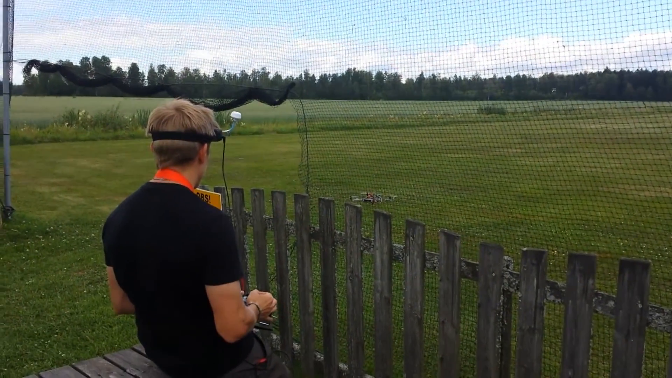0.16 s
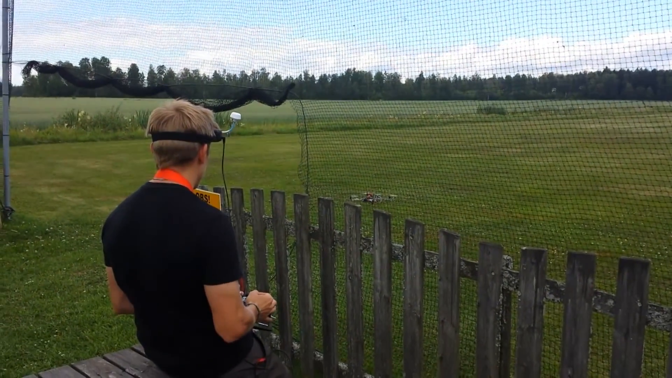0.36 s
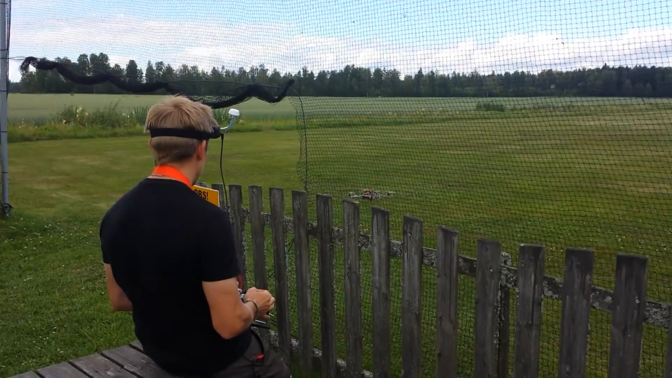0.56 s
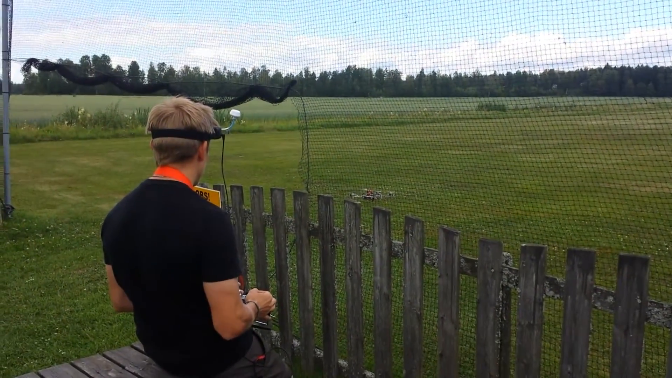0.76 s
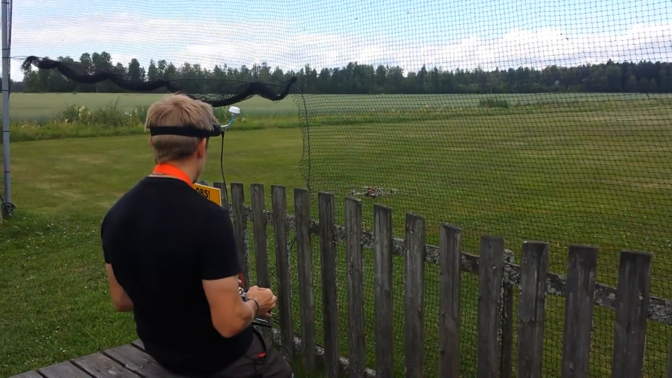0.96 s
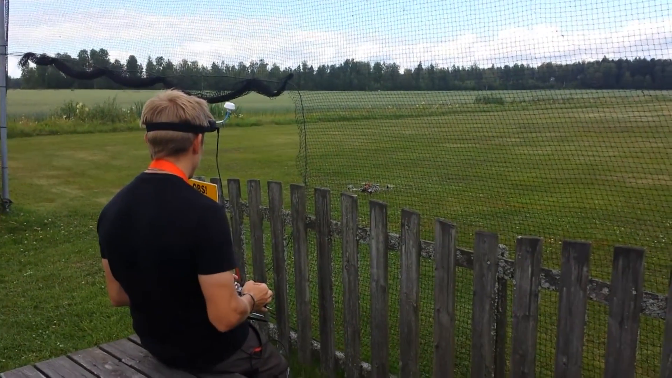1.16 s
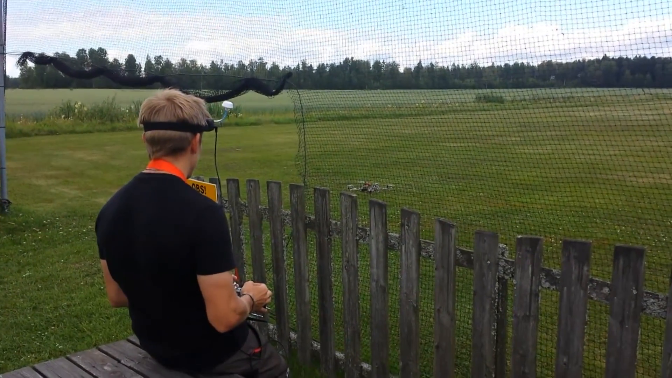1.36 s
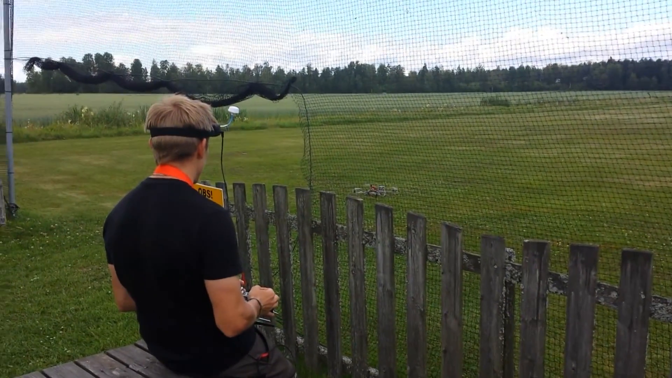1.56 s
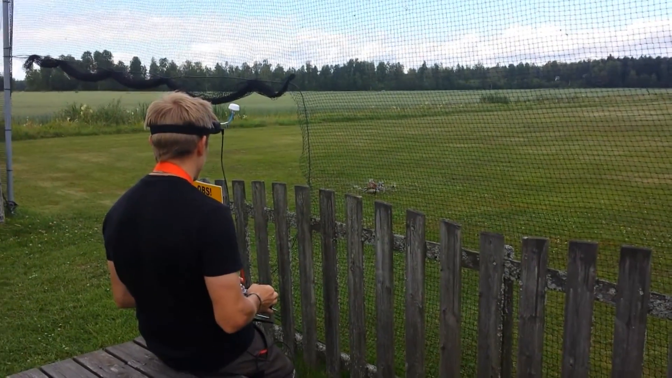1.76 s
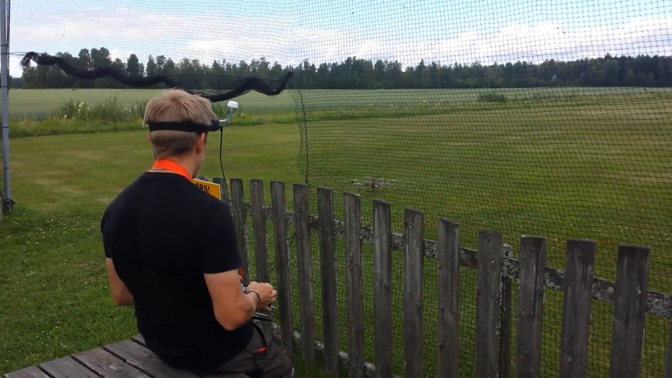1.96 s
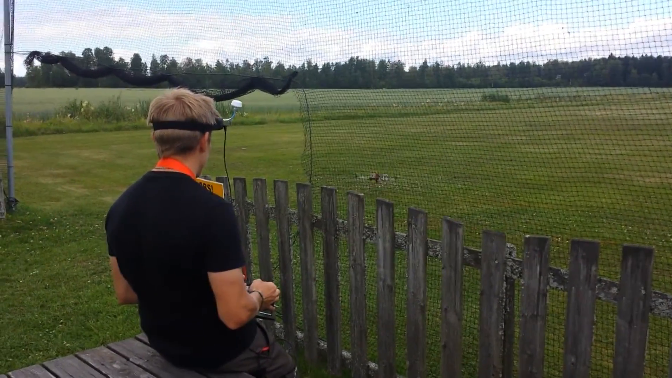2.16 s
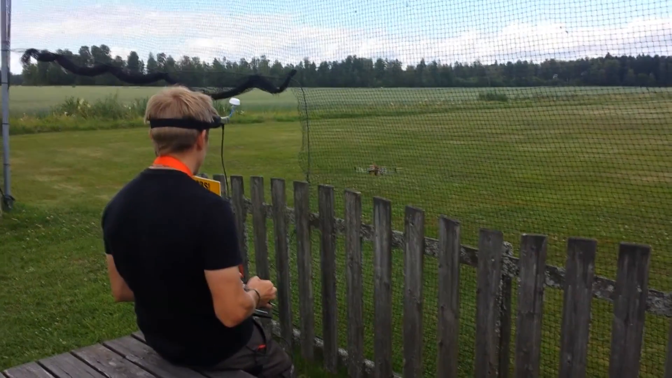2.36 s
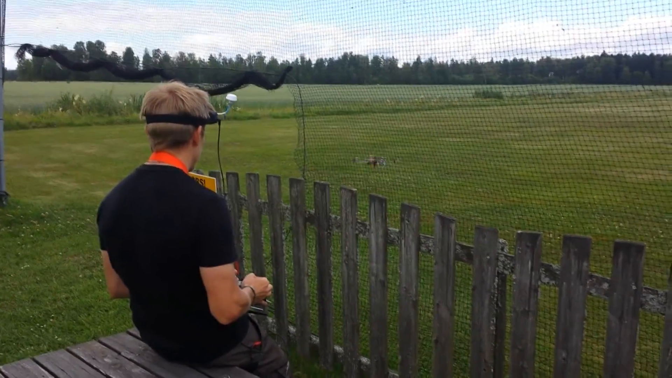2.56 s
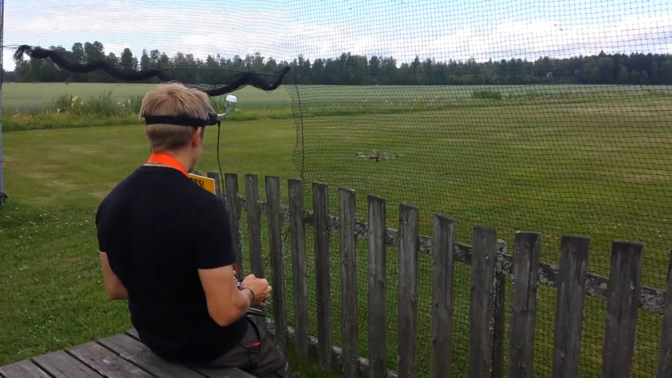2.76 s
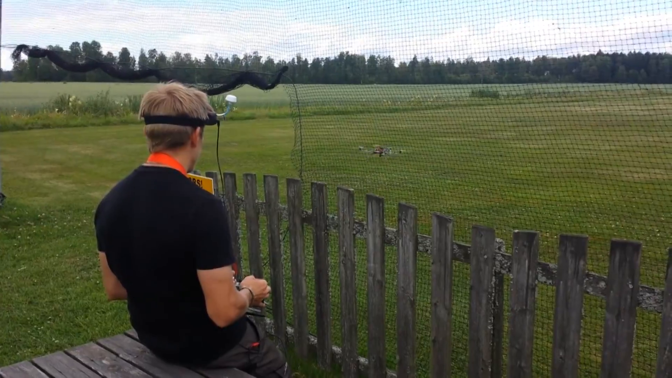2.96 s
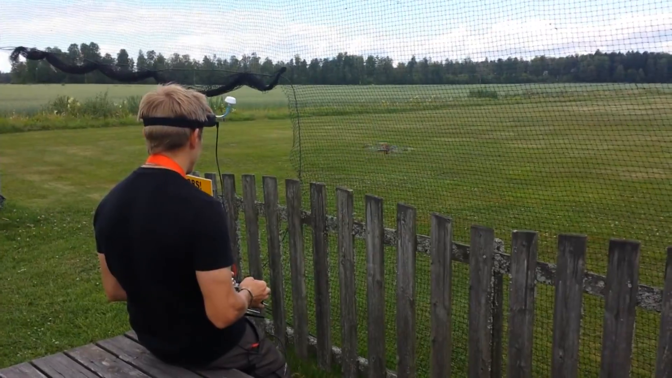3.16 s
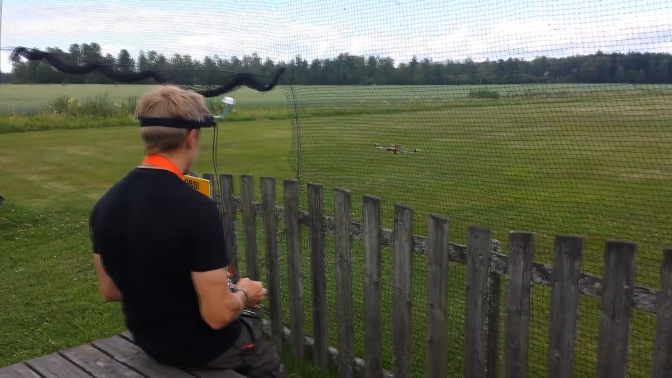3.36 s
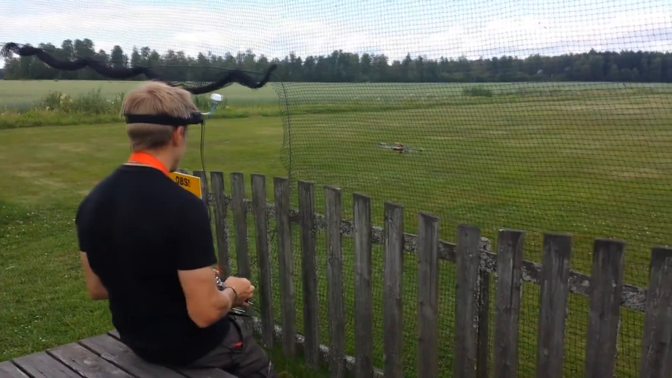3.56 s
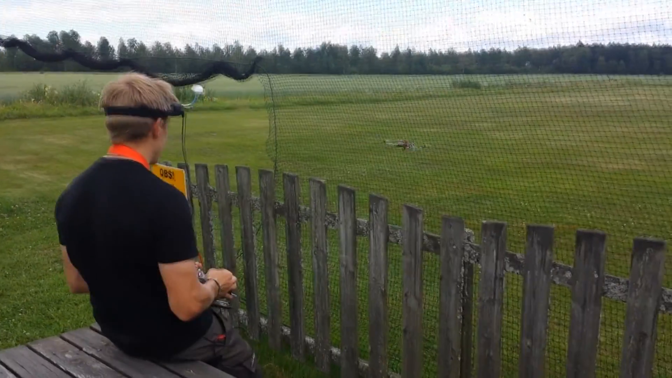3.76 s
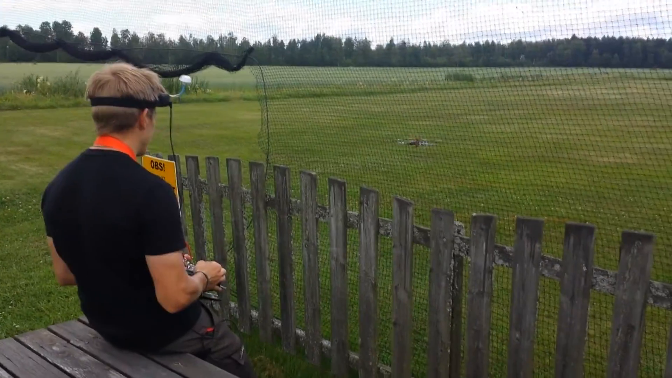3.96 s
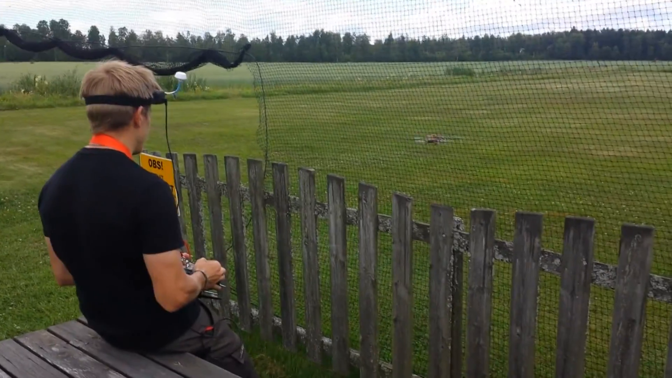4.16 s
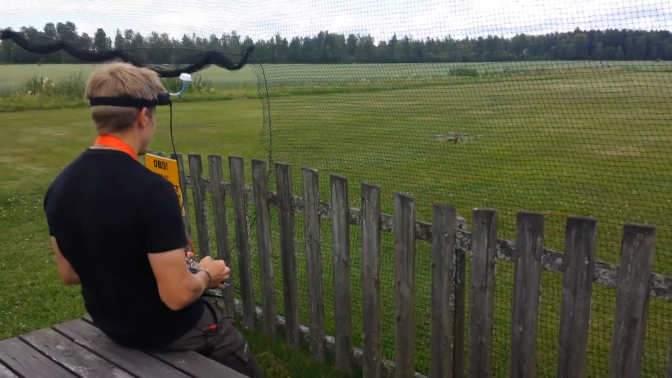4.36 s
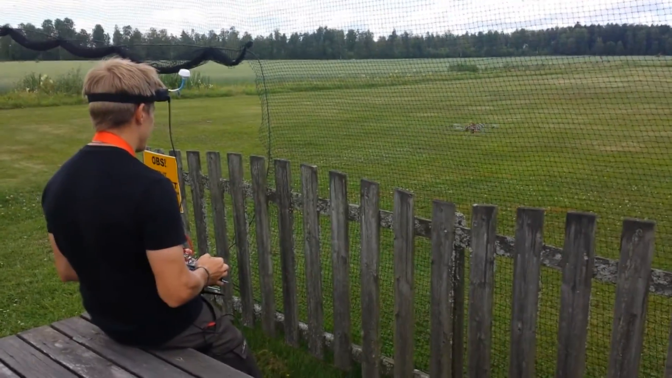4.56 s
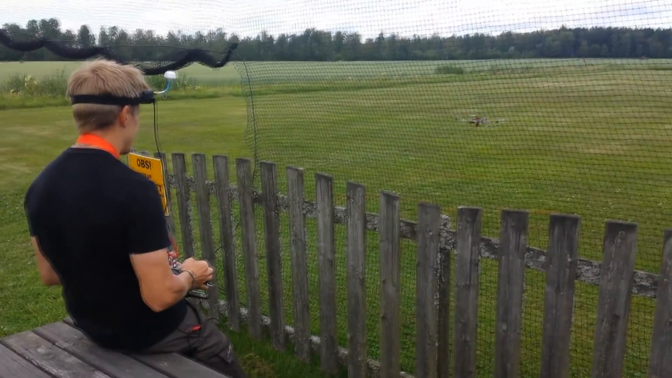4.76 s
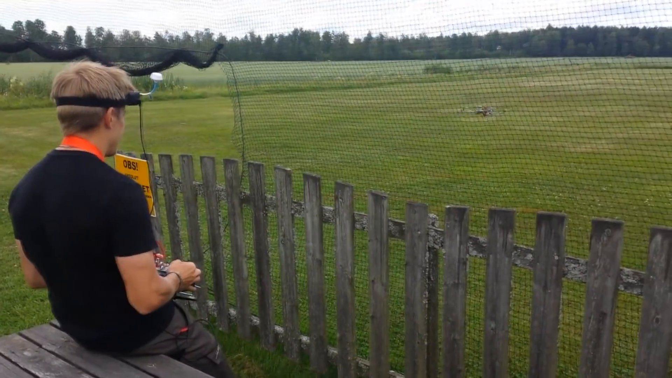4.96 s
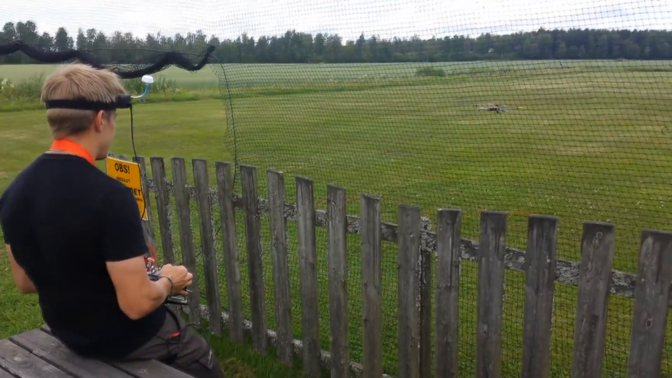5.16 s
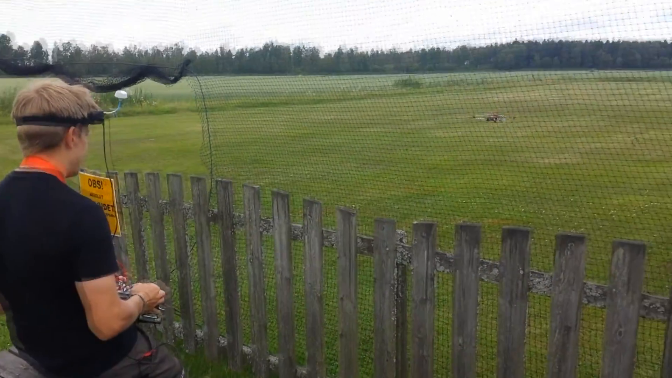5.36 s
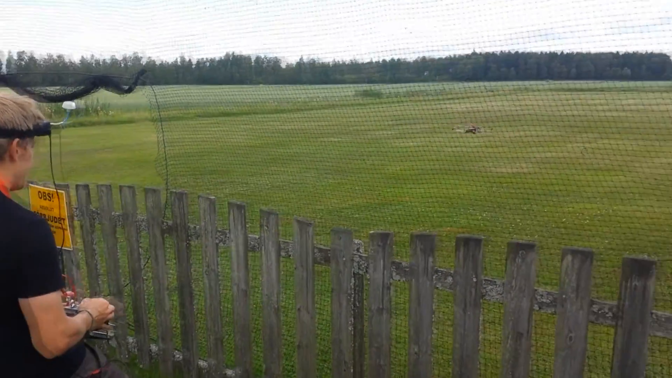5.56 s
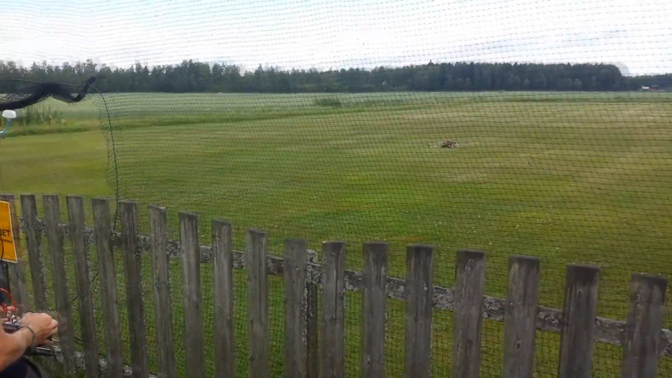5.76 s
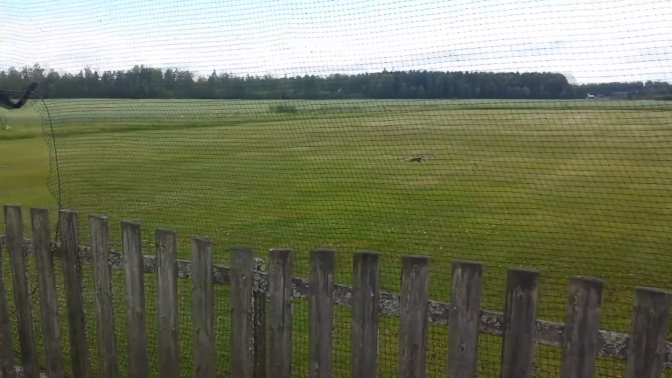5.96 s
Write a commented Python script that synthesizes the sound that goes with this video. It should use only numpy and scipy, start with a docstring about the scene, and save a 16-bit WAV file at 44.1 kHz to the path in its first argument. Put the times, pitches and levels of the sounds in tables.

```python
"""A small four-rotor drone spins up on the grass, lifts off and flies over a field.
Each motor hums at its blade rate, whines at multiples of its seven magnet pairs and at its
controller's switching clock; the windings buzz and the rotors hiss, both made of shaped noise.
Behind it, low noise makes the wind rumble on two microphone ports, pressure steps pop, and air is faint."""
import sys
import numpy as np
from scipy import signal
from scipy.fft import rfft, irfft, next_fast_len
from scipy.io import wavfile
from scipy.ndimage import uniform_filter1d

SR = 44100
rng = np.random.default_rng(int(sys.argv[2]) if len(sys.argv) > 2 else 0)


def dump_mix(stems):
    """Bounce the given channels to the path in sys.argv[1] as a 16-bit WAV at rate SR."""
    frames = np.atleast_2d(stems).T  # one column per channel
    limited = np.clip(frames, -1, 1)  # hard clip at full scale
    pcm = np.round(limited * 32767).astype(np.int16)
    wavfile.write(sys.argv[1], SR, pcm)


N = 264688

# gains of the drone's sounds: [start_s, hiss_db, clock_db, buzz_db, commutation_db]
FLIGHT_LEVELS = [(0.0, -101, -62.5, -58, -90), (0.3, -59.5, -59, -61, -61), (0.55, -53.5, -59, -66.5, -57),
                 (0.9, -51.5, -61, -63, -50), (1.14, -54.5, -56.5, -62.5, -47),
                 (1.44, -44, -58, -58.5, -40.5), (1.64, -38.5, -46.5, -54, -43),
                 (1.86, -36, -48.5, -52, -41.5), (2.24, -40, -53.5, -52, -40),
                 (2.67, -40.5, -51, -47.5, -31), (3.06, -42, -49, -47, -37), (3.69, -45, -48.5, -45, -38),
                 (4.08, -39.5, -53.5, -44.5, -40.5), (4.5, -37, -55.5, -46.5, -36),
                 (4.91, -43, -52, -47.5, -41.5), (5.28, -47.5, -47, -50, -38),
                 (6.0, -44, -50, -46.5, -38.5)]
# slow course of the bell ringing: [start_s, level_db]
RINGING = [(0.0, -102), (0.6, -38), (1.0, -65), (1.6, -75), (2.9, -84), (3.15, -54), (4.3, -45), (5.6, -33),
           (6.0, -37.5)]
# extra short swells of the ringing: [middle_s, peak_db, length_s]
RINGING_SWELLS = [(0.14, -24.5, 0.11), (0.3, -24.5, 0.096), (0.7, -33.5, 0.033), (1.31, -34.5, 0.04),
                  (1.41, -25, 0.036), (1.68, -28, 0.047), (1.95, -31.5, 0.12), (2.14, -32.5, 0.073),
                  (2.5, -32.5, 0.068), (2.68, -46, 0.17), (2.81, -36, 0.041), (3.01, -27.5, 0.096),
                  (3.27, -30.5, 0.032), (3.45, -27, 0.06), (3.74, -27.5, 0.13), (4.8, -29, 0.074),
                  (4.92, -32, 0.19), (5.29, -22.5, 0.16), (5.57, -26, 0.092), (5.98, -31.5, 0.06)]
# motor lines over the winding buzz gain: [start_s, level_db]
LINES_OVER_BUZZ = [(0, 5), (.55, 7), (1.3, 8), (1.6, 4), (3.9, 4.5), (4.1, 3), (6, 4)]
# how the arms radiate the commutation tones: [pitch_hz, level_db]
ARM_TONE = [(1000, 4), (2400, 2), (2780, -10), (2950, 1), (3150, -2), (3350, -8), (3600, -12), (6500, -4),
            (9300, -4), (9900, 6), (10500, -4)]
# treble lift of the cavity at the left port: [pitch_hz, level_db over the right port]
LEFT_CAVITY = [(100, 0), (2500, 0), (3000, -1), (3600, 11), (4400, 18), (4900, 21), (5800, 15), (6600, 4),
               (7750, 11), (10000, 8), (15000, 10)]
# how much earlier the left port hears: [start_s, lead_ms]
LEFT_LEAD = [(0, 0.16), (3.5, 0.25), (5.2, 0.309), (6, 0.26)]
GROUND_ECHO_MS, GROUND_ECHO_DB = 1.28, [-20, -8]   # echo gain at the left and right port
HUM_OVER_HISS_DB, SIDES_OVER_LINES_DB = -9.5, -8


def drone():
    """Motors, buzz and hiss reach two ports; a cavity lifts the left treble, grass returns a short echo."""
    hiss_db, clock_db, buzz_db, commutation_db = in_time(FLIGHT_LEVELS)
    hum, commutation, whine, clocks, sides, chop = motors()
    rattle = .15 * rms_one(bell(rng.standard_normal(N)))
    ringing_gain = from_db(in_time(RINGING)[0]) + swells(RINGING_SWELLS)
    line_gain = from_db(buzz_db + in_time(LINES_OVER_BUZZ)[0])

    tones = ringing_gain * bell(whine + rattle)
    tones += line_gain * (colour(whine, BUZZ_TONE) + from_db(SIDES_OVER_LINES_DB) * sides)
    tones += from_db(clock_db) * clocks
    tones += from_db(commutation_db) * colour(commutation, ARM_TONE)
    tones += from_db(hiss_db + HUM_OVER_HISS_DB) * hum

    buzz = from_db(buzz_db) * winding_buzz()
    hiss = from_db(hiss_db) * rotor_hiss(chop)
    ports = []
    for port, echo_db in enumerate(GROUND_ECHO_DB):
        direct = hiss[port] + buzz[port] + tones
        dulled = uniform_filter1d(direct, size=4)   # grass dulls the echo
        ports.append(direct + from_db(echo_db) * delayed(dulled, GROUND_ECHO_MS))
    return np.array([colour(ports[0], LEFT_CAVITY), delayed(ports[1], in_time(LEFT_LEAD)[0])])


# one speed curve per motor, before the spin-up share and smoothing: [start_s, shaft_turns_per_s]
SPEED_CURVES = [
    [(1.05, 69.4), (1.28, 69.6), (1.47, 75.2), (1.7, 72.8), (1.97, 79.2), (2.33, 69.6), (2.58, 75.9),
     (2.75, 73.4), (2.9, 75.1), (3.3, 74.2), (3.42, 72.5), (3.72, 73.3), (3.87, 70.8), (4.1, 84.0),
     (4.4, 81.5), (4.55, 80.5), (4.68, 80.0), (4.86, 71.7), (5.0, 72.1), (5.25, 68.4), (5.48, 69.6),
     (5.66, 67.6), (5.85, 72.2), (6.0, 72.2)],
    [(1.05, 72.1), (1.26, 72.4), (1.41, 78.8), (1.9, 81.0), (2.12, 77.4), (2.33, 79.2), (2.6, 75.5),
     (2.72, 79.0), (3.0, 79.5), (3.15, 76.0), (3.3, 78.6), (3.5, 78.5), (3.68, 76.0), (3.9, 85.0),
     (4.1, 86.0), (4.38, 88.0), (4.7, 86.8), (4.9, 77.3), (5.05, 73.7), (5.28, 73.8), (5.46, 71.1),
     (5.62, 72.2), (5.85, 69.9), (6.0, 72.7)],
    [(0.5, 73.0), (0.7, 70.3), (0.8, 71.6), (0.9, 73.7), (1.5, 73.7), (1.7, 78.9), (1.9, 81.4),
     (2.05, 78.7), (2.15, 80.9), (2.28, 79.5), (2.42, 78.3), (2.52, 81.4), (2.66, 79.5), (2.8, 79.5),
     (2.9, 84.2), (3.07, 78.0), (3.21, 77.5), (3.33, 84.0), (3.55, 77.2), (3.74, 81.1), (3.82, 81.2),
     (3.91, 78.4), (4.06, 81.8), (4.3, 82.6), (4.55, 83.0), (4.85, 82.4), (5.0, 79.2), (5.17, 75.3),
     (5.3, 76.0), (5.45, 77.4), (5.55, 75.9), (5.64, 77.7), (5.73, 75.6), (5.8, 79.5), (6.0, 80.5)],
    [(1.05, 64.7), (1.26, 65.3), (1.5, 74.6), (1.68, 73.6), (1.83, 77.2), (1.93, 82.0), (2.03, 78.9),
     (2.14, 81.2), (2.25, 78.5), (2.42, 83.4), (2.56, 83.5), (2.7, 80.2), (2.95, 77.0), (3.1, 79.0),
     (3.42, 73.3), (3.7, 79.8), (3.85, 82.0), (4.0, 85.5), (4.12, 88.0), (4.3, 87.2), (4.45, 88.0),
     (4.76, 87.0), (4.86, 82.3), (5.05, 78.8), (5.2, 76.2), (5.43, 77.5), (5.68, 75.5), (5.82, 79.7),
     (6.0, 77.8)],
]
# each motor's clock against the common one: [offset_hz]
CLOCK_OFFSETS = [-8, 7, -13, -1]
# loudness of each motor's clock tone: [level_db]
CLOCK_SHARES = [0, -2, -15, -16]
# how each motor's commutation tones carry as the craft turns: [start_s, then level_db of four motors]
MOTOR_SHARES = [(0, 12, -6, -11, -15), (0.8, -17, 6, -11, -19), (1.3, -12, -4, -12, -18),
                (1.75, 4, -5, -7, -8), (2.15, -1.5, 1, -9, 3), (2.45, -2.5, -5, -12, -6),
                (2.65, -13, -17, -18, -11), (2.95, -11.5, -10, -5, -8), (3.15, -3, 3, -4, -15),
                (3.35, -5, -7, -3, -6), (3.65, -4.5, -2.5, -3, -1), (3.85, -2, -3, -1, -11),
                (4.1, -8, -3, 1, -11), (4.6, -3, -12, -10, -8), (4.9, -1.5, 1, -7, -4),
                (5.2, -2.5, -5.5, -14, 0.5), (5.65, -1, -5.5, -14, -2), (6, -5.5, 5.5, -19, -2)]
# extra unevenness of each motor: [factor]
HUNT_BY_MOTOR = [2.5, 1.2, 3, .5]
# the motors take up the load between these times: [time_s]
LIFT_OFF = [1.45, 1.85]
# spin-up: speed starts at this share of its curve and closes the gap ever more slowly
SPIN_UP_S, SPIN_START_SHARE, SPIN_EASE = 1.05, .43, 2.3
# the controllers hunt around their set speed, more at a higher mean speed and during spin-up
HUNT_SHARE, HUNT_AT_PER_S, HUNT_DOUBLES_PER_S, SPIN_HUNT = .0005, 78, 2.5, 14
# the switching clock sags quickly under first load, then slowly with the battery
CLOCK_HZ, CLOCK_FIRST_SAG_HZ, CLOCK_SETTLE_S, CLOCK_SAG_HZ_PER_S = 7760, 40, .3, 2.9
HUM_SPIN_POWER = 1.2   # blades hum little until they are up to speed


def motors():
    """Four turning shafts and switching clocks drive every tone, and the blade-rate chop of the hiss."""
    t = np.arange(N) / SR
    spin = 1 - (1 - SPIN_START_SHARE) * np.maximum(1 - t / SPIN_UP_S, 0) ** SPIN_EASE
    speeds = [spin * uniform_filter1d(in_time(rows)[0], size=3500) for rows in SPEED_CURVES]
    mean_speed = np.mean(speeds, axis=0)
    climb = mean_speed - HUNT_AT_PER_S
    hunt = 2 ** (climb / HUNT_DOUBLES_PER_S) + SPIN_HUNT * (1 - spin)
    load = np.interp(t, LIFT_OFF, [0, 1])
    first_sag_hz = CLOCK_FIRST_SAG_HZ * np.exp(-t / CLOCK_SETTLE_S)
    clock_hz = CLOCK_HZ + first_sag_hz - CLOCK_SAG_HZ_PER_S * t
    carry_db = in_time(MOTOR_SHARES)

    hum = commutation = whine = clocks = sides = chop = 0
    for motor, speed in enumerate(speeds):
        unevenness = HUNT_SHARE * (1 + HUNT_BY_MOTOR[motor] * hunt) * drift(24.2)
        shaft = turns(speed * (1 + unevenness))
        clock = turns(clock_hz + CLOCK_OFFSETS[motor] + 1.2 * drift(3))
        thrust = (speed / mean_speed) ** 4.9   # the harder a rotor pulls, the louder its blades
        hum = hum + thrust * blade_hum(shaft, climb * load)
        commutation = commutation + commutation_tones(shaft, carry_db[motor], t)
        whine = whine + bell_lines(shaft, clock, motor, load)
        clocks = clocks + clock_tones(shaft, clock, CLOCK_SHARES[motor])
        sides = sides + side_tones(shaft, clock, t)
        chop = chop + np.cos(2 * shaft)
    return hum * spin ** HUM_SPIN_POWER, commutation, whine, clocks, sides, chop


# blade hum: [shaft_multiple, level_db, gain_db per turn per s of climb]
BLADE_ORDERS = [(1, -25, 0.3), (2, 1, -0.25), (3, -8, 0.87), (4, -7.5, -0.12), (6, -16, 1), (8, -12, 0.46),
                (10, -15.5, -0.15)]


def blade_hum(shaft, climb):
    """Blades push the air at shaft multiples, strongest at twice the shaft rate."""
    phases = [order * shaft for order, _, _ in BLADE_ORDERS]
    levels_db = [db + gain_db * climb for _, db, gain_db in BLADE_ORDERS]
    return lines(phases, levels_db, flicker_db=4.0, rate=12)


# six commutations per magnet pair and turn, with neighbours: [shaft_multiple, start_db, at_speed_db]
COMMUTATION = [(21, -22, -22), (42, -4, 0), (84, 7, -14), (126, -10, -27)]


def commutation_tones(shaft, carry_db, t):
    """Switching current from winding to winding makes tones at high shaft multiples."""
    at_speed = np.clip(2 * t / SPIN_UP_S, 0, 1)
    phases = [order * shaft for order, _, _ in COMMUTATION]
    levels_db = [carry_db + start_db + (db - start_db) * at_speed for _, start_db, db in COMMUTATION]
    return lines(phases, levels_db, flicker_db=3.0, rate=14)


# lines near the bell's ring: [clock_multiple, shaft_multiple, flight_gain_db, then level_db of four motors]
BELL_LINES = [(0, 70, -3, 1, -8, 3, -4), (0, 84, -6, -16, -12, -16, -16), (1, -21, -3, 2, -2, -4, -4),
              (1, -28, 1, 2, 2, -4, 5), (1, -31, 9, -22, -22, -7, -20), (1, -35, 9, -14, -16, -7, -13)]


def bell_lines(shaft, clock, motor, load):
    """Magnet and clock lines glide with the motor speed through the pitches where the bell rings."""
    phases = [m * clock + k * shaft for m, k, *_ in BELL_LINES]
    levels_db = [db[motor] + gain_db * load for _, _, gain_db, *db in BELL_LINES]
    return lines(phases, levels_db, flicker_db=2.5)


# modes of the motor bell: [pitch_hz, width_hz of one pass, level_db]
BELL_MODES = [(4900, 270, -11.5), (4776, 175, -15.5)]


def bell(x):
    """The motor bell rings when a line crosses one of its modes; each mode acts twice, for steep skirts."""
    out = 0
    for hz, width_hz, db in BELL_MODES:
        r = np.exp(-np.pi * width_hz / SR)
        mode = [(1 - r * r) / 2, 0, (r * r - 1) / 2, 1, -2 * r * np.cos(2 * np.pi * hz / SR), r * r]
        out = out + from_db(db) * signal.sosfilt([mode, mode], x)
    return out


# clock tone, split by the unbalanced shaft: [shaft_multiple, level_db]
CLOCK_LINES = [(0, 9), (-1, -36), (1, -7.5)]


def clock_tones(shaft, clock, share_db):
    """The controller's switching clock sings, with side lines one shaft turn away."""
    phases = [clock + k * shaft for k, _ in CLOCK_LINES]
    return lines(phases, [db + share_db for _, db in CLOCK_LINES], flicker_db=1.2)


# magnets passing the windings split the clock: [clock_multiple, shaft_multiple, start_db, at_speed_db]
SIDE_LINES = [(1, -14, -1, 1), (1, 14, -2, -5), (1, -15, -9, -9), (1, 13, -16, -16), (1, 28, -17, -17),
              (1, 42, -1, -18), (2, -14, -14, -16)]


def side_tones(shaft, clock, t):
    """Passing magnets add lines above and below the clock, mostly near multiples of seven shaft turns."""
    at_speed = np.clip(t / SPIN_UP_S, 0, 1) ** 2
    phases = [m * clock + k * shaft for m, k, _, _ in SIDE_LINES]
    levels_db = [start_db + (db - start_db) * at_speed for _, _, start_db, db in SIDE_LINES]
    return lines(phases, levels_db, flicker_db=2.0)


# tone colour of the winding buzz: [pitch_hz, level_db]
BUZZ_TONE = [(2000, -38), (3200, -33), (4300, -14), (5000, -5.5), (5700, -13.5), (6500, -20.5), (9000, -20),
             (15000, -32.5)]


def winding_buzz():
    """The windings buzz as shaped noise, partly different at each port."""
    noise = rng.standard_normal((3, N))   # left only, right only, shared
    return np.array([rms_one(colour(noise[2] + 1.8 * noise[port], BUZZ_TONE)) for port in (0, 1)])


# tone colour of the rotor hiss: [pitch_hz, level_db]
HISS_TONE = [(25, -7), (70, 2.5), (150, -20), (320, 4.5), (420, -3.5), (700, 0), (1200, 3.5), (1800, 2),
             (2500, 5.5), (4000, -2), (7000, -0.5), (10000, -10.5), (11500, -13), (12500, -12.5),
             (15000, -25)]


def rotor_hiss(chop):
    """Rough air off the rotors hisses, chopped at the blade rate and partly different at each port."""
    air = rng.standard_normal((3, N)) * (1 + .1 * chop) * from_db(1.2 * drift(6))
    return np.array([rms_one(colour(air[2] + .85 * air[port], HISS_TONE)) for port in (0, 1)])


# gusts on the left port: [middle_s, peak_db, length_s]
LEFT_GUSTS = [(0.05, -63, 0.38), (1.82, -43, 0.43), (2.18, -37, 0.27), (2.5, -45, 0.46), (3.35, -55, 0.47),
              (4.1, -52, 0.24), (4.95, -49.5, 0.27), (5.37, -53, 0.34), (5.79, -39, 0.088)]
# gusts on the right port: [middle_s, peak_db, length_s]
RIGHT_GUSTS = [(1.13, -22.5, 0.023), (1.23, -32, 0.16), (1.33, -24, 0.14), (1.46, -22, 0.12),
               (1.54, -16.5, 0.058), (1.62, -31, 0.044), (1.7, -27.5, 0.062), (2.05, -31, 0.11),
               (2.15, -30, 0.16), (2.27, -27, 0.055), (2.4, -27.5, 0.1), (2.62, -43, 0.19),
               (3.12, -35, 0.068), (3.24, -40, 0.26), (3.38, -27, 0.035), (3.5, -32.5, 0.07),
               (3.62, -42, 0.041), (4.38, -38, 0.21), (5.0, -48, 0.22), (5.8, -54, .2)]
# sudden pressure steps, before the capsule leak: [start_s, step_db, port (0 left, 1 right), rise_ms]
PRESSURE_STEPS = [(.4928, 1.5, 1, 0.0099), (1.86, -11.5, 0, 0.31), (4.08, -7, 0, 0.082)]
BREEZE_DB, MIC_LOW_HZ = -77, 93


def wind():
    """Lumpy low turbulence on each port, plus pops; the capsule leaks below its corner, so steps die away."""
    lowpass = signal.butter(3, 95, fs=SR, output="sos")
    low = signal.sosfilt(lowpass, rng.standard_normal((2, N)))
    lumps = from_db(4.0 * np.array([drift(22), drift(25)]))
    gusts = np.array([swells(LEFT_GUSTS), swells(RIGHT_GUSTS)])
    pressure = (from_db(BREEZE_DB) + gusts) * rms_one(low * lumps)
    for s, db, port, rise_ms in PRESSURE_STEPS:
        rise = np.clip((np.arange(N) / SR - s) * 1000 / rise_ms, 0, 1)
        pressure[int(round(port))] += from_db(db) * rise
    leak = signal.butter(2, MIC_LOW_HZ, "high", fs=SR, output="sos")
    return signal.sosfilt(leak, pressure)


def field():
    """Faint air over the grass: steady noise, strongest in the bass."""
    tone = [(25, 8), (60, 16.5), (300, 4.0), (2000, 2.0), (12000, -10.0)]   # pitch_hz, level_db
    return from_db(-58.5) * rms_one(colour(rng.standard_normal((2, N)), tone))


def lines(phases, levels_db, flicker_db, rate=4.3):
    """Sines that each swell and fade on their own as the frame tilts."""
    total = 0
    for phase, db in zip(phases, levels_db):
        gain = from_db(db + flicker_db * drift(rate))
        total = total + gain * np.sin(phase + 7 * rng.random())
    return total


def turns(per_s):
    """Running phase in radians from a random start."""
    return 2 * np.pi * (np.cumsum(per_s) / SR + rng.random())


def drift(rate):
    """Slow random wander of spread 1, changing about rate times a second."""
    r = np.exp(-80 * np.pi * rate / SR)   # computed at every 40th sample
    noise = rng.standard_normal(N // 40 + 2002)
    slow = signal.lfilter([1], [1, -2 * r, r * r], noise)[2000:]
    return np.interp(np.arange(N) / 40, np.arange(len(slow)), rms_one(slow))


def swells(rows):
    """Gain that rises and falls as a bell curve around each (middle_s, peak_db, length_s) row."""
    t = np.arange(0, N, 64) / SR
    gain = sum(from_db(db) * np.exp(-(2 * (t - s) / max(length, .02)) ** 2) for s, db, length in rows)
    return np.interp(np.arange(N) / SR, t, gain)


def colour(x, points):
    """Shapes a sound by a fixed (pitch_hz, level_db) curve."""
    size = next_fast_len(N + 4096)
    hz = np.maximum(np.arange(size // 2 + 1) * SR / size, 1)
    points = np.array(points)
    curve_db = np.interp(np.log(hz), np.log(points[:, 0]), points[:, 1])
    return irfft(rfft(x, size) * from_db(curve_db), size)[..., :N]


def delayed(x, ms):
    """Plays a sound later by a fixed or changing time."""
    return np.interp(np.arange(N) - ms * SR / 1000, np.arange(N), x)


def in_time(rows):
    """Draws straight lines between table rows, one curve per column after the time."""
    s, *columns = np.transpose(rows)
    return [np.interp(np.arange(N) / SR, s, c) for c in columns]


def from_db(db):
    """Turns decibels into a plain gain."""
    return 10 ** (np.asarray(db) / 20)


def rms_one(x):
    """Scales a signal to an effective level of 1."""
    return x / np.sqrt(np.mean(x ** 2) + 1e-20)


def scene():
    """The drone, the wind on the ports and the field air together."""
    return drone() + wind() + field()


def record(dry):
    """The loudest peaks are rounded off, then the top is cut steeply."""
    top = .95
    rounded = top * np.tanh(dry / top)
    top_cut = signal.cheby2(22, 80, 15100, fs=SR, output="sos")   # 80 dB down from 15100 Hz up
    return signal.sosfilt(top_cut, rounded)


dry = scene()
out = record(dry)
dump_mix(out)
```